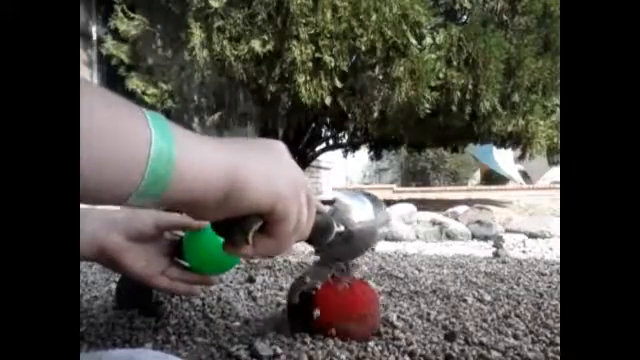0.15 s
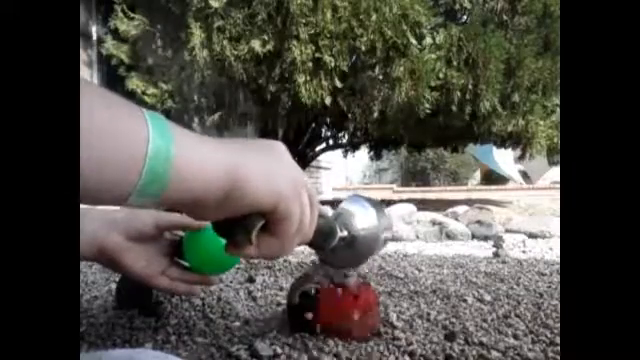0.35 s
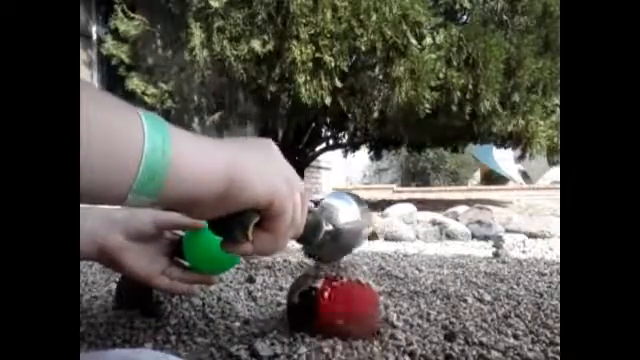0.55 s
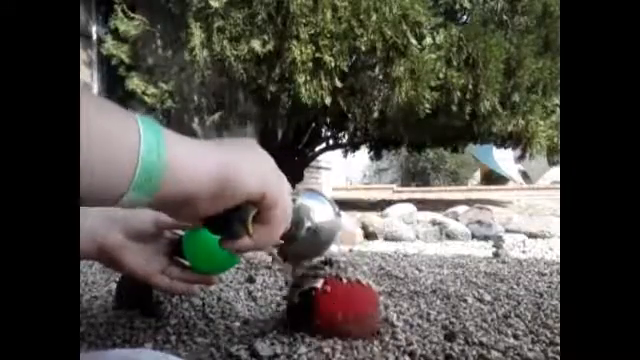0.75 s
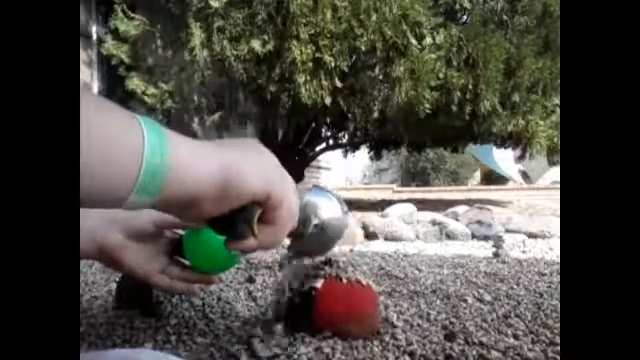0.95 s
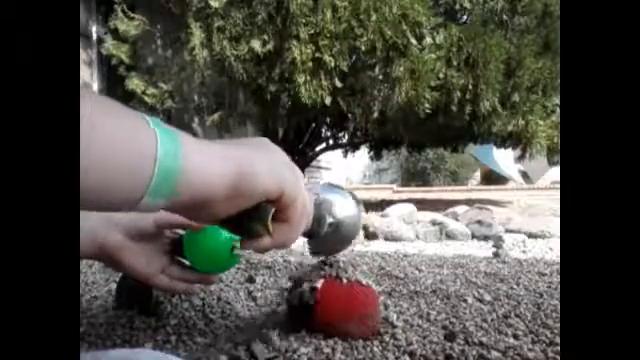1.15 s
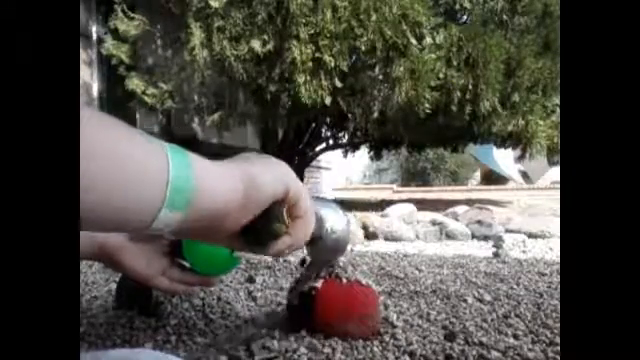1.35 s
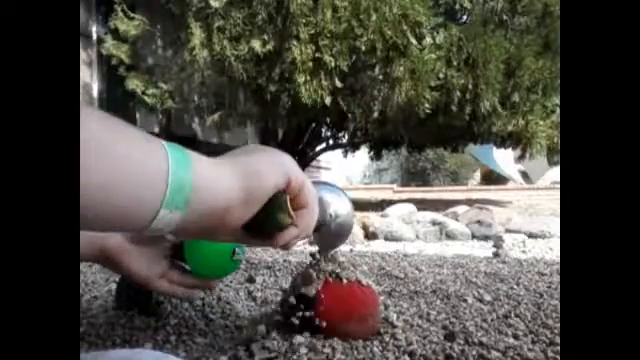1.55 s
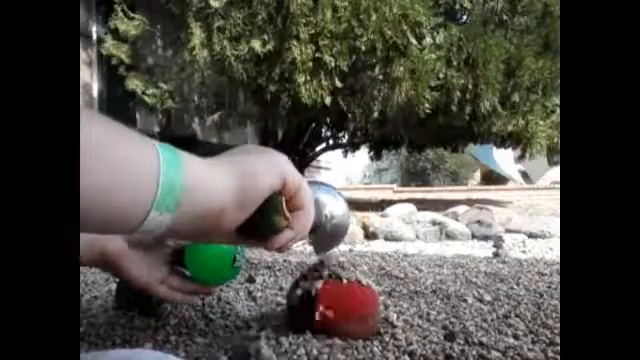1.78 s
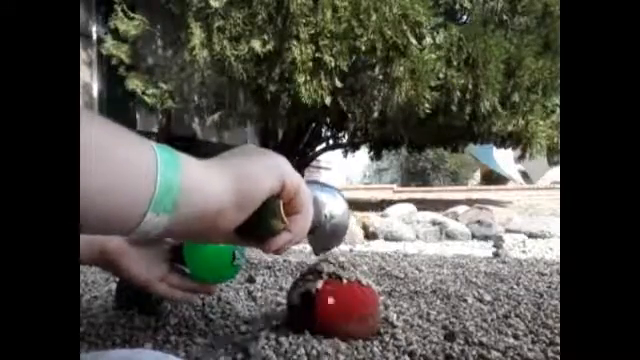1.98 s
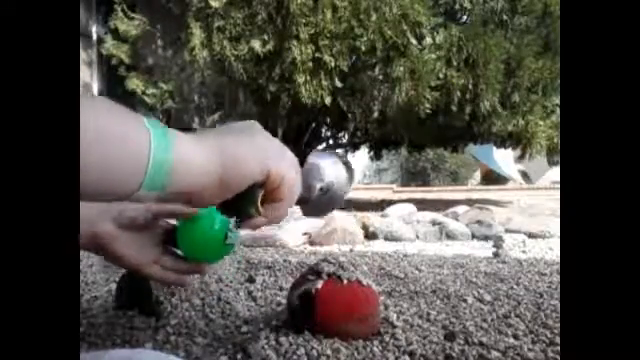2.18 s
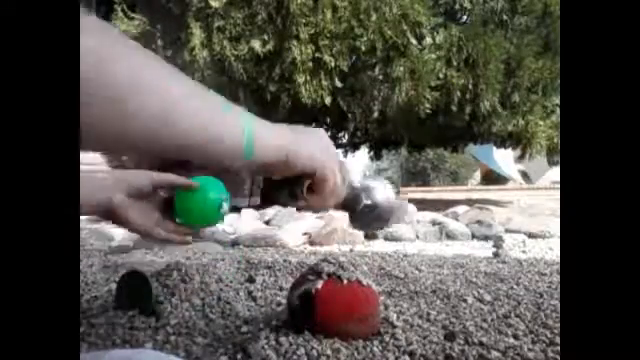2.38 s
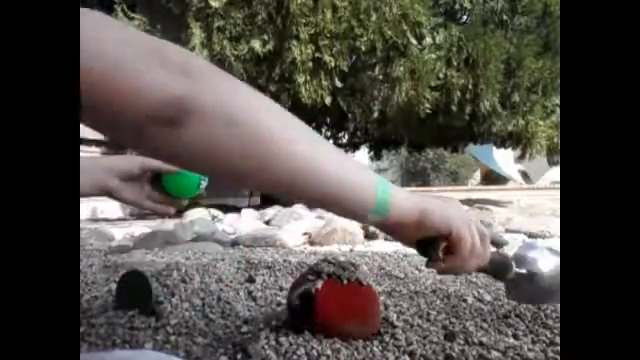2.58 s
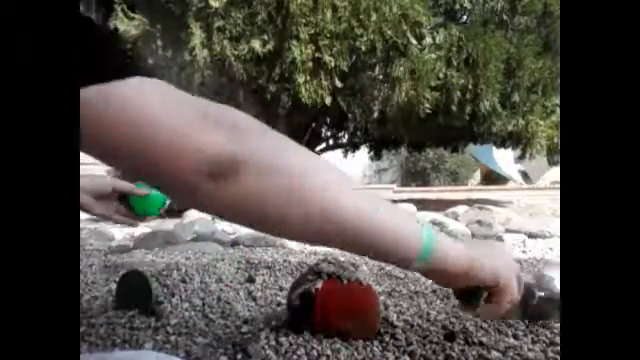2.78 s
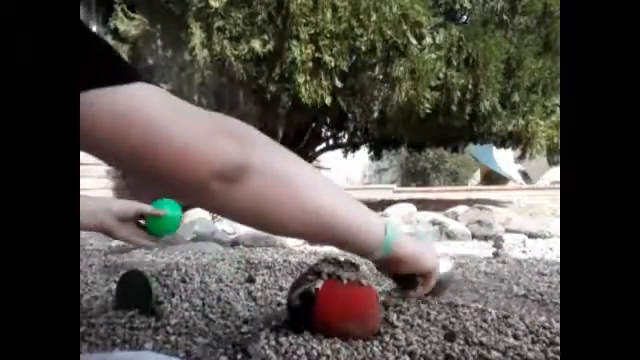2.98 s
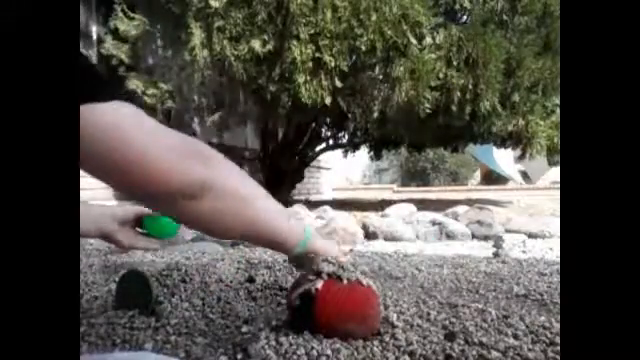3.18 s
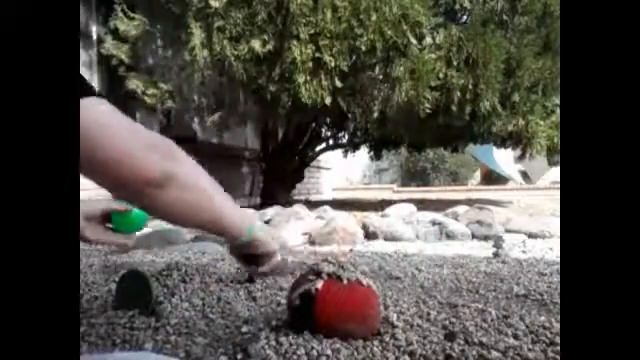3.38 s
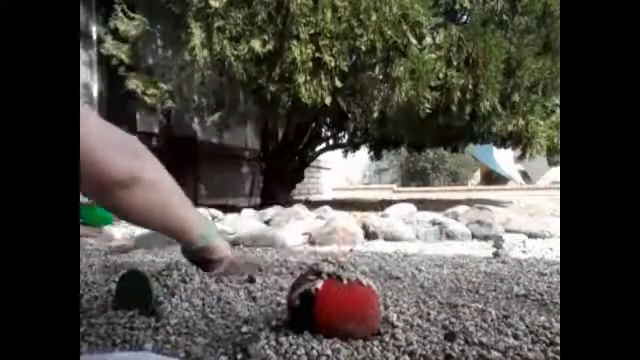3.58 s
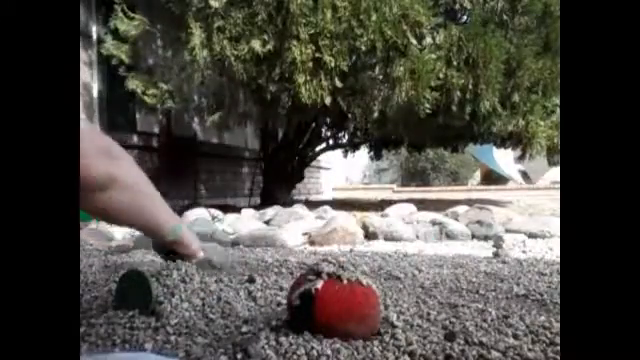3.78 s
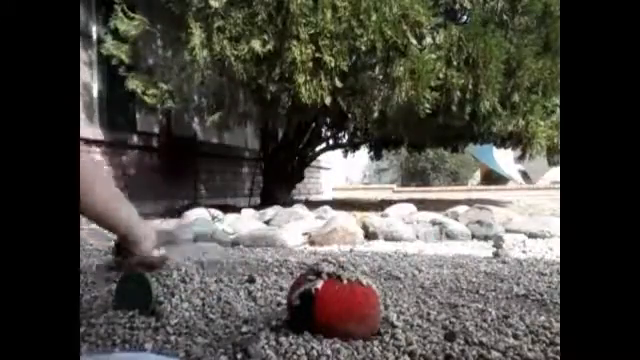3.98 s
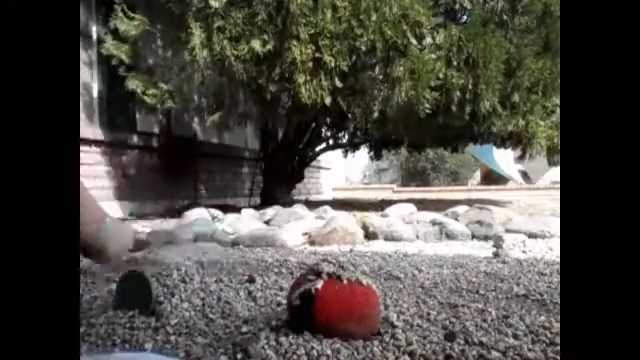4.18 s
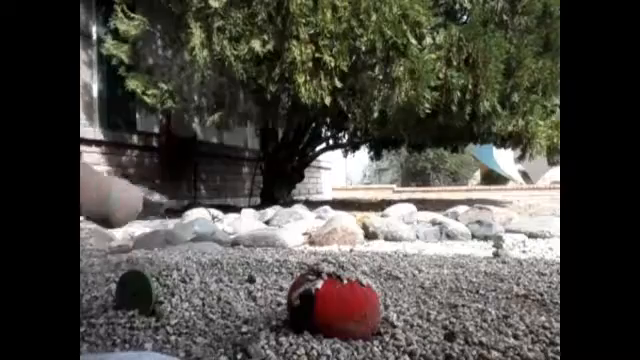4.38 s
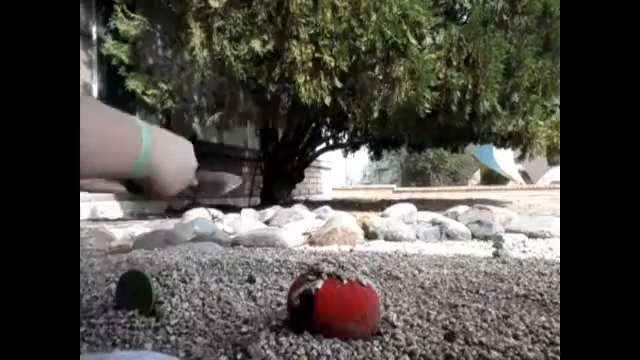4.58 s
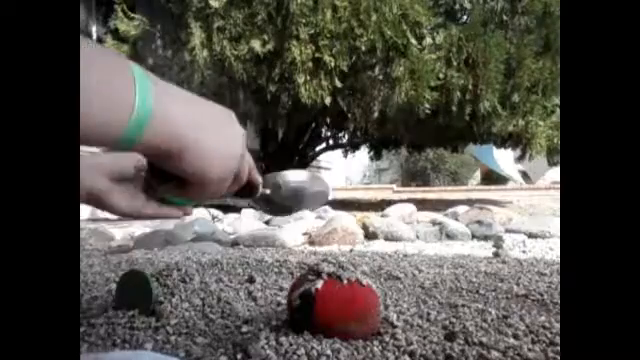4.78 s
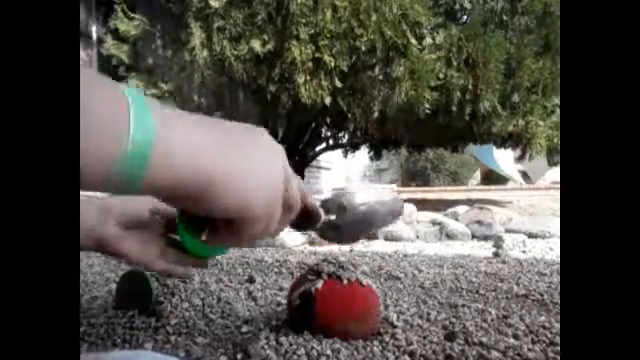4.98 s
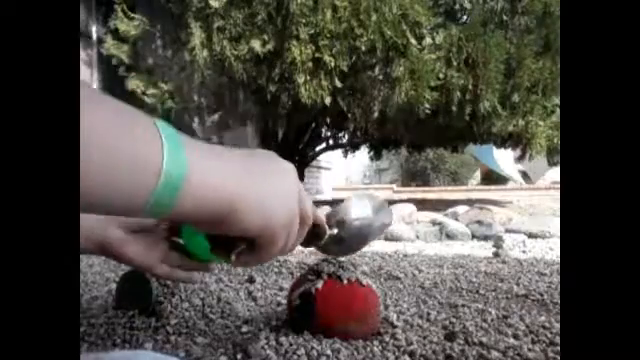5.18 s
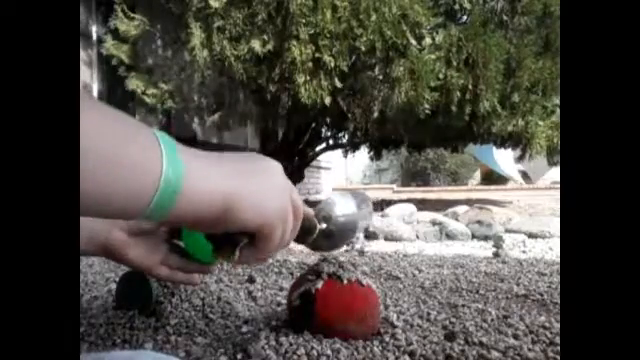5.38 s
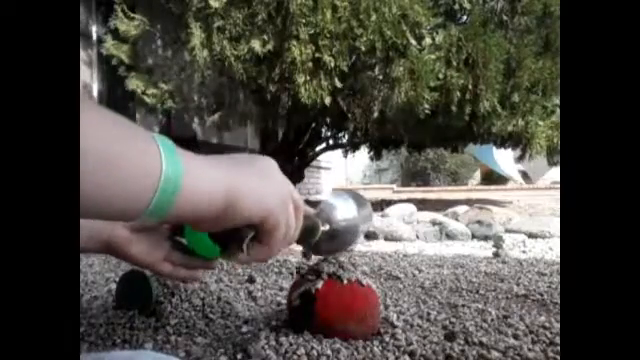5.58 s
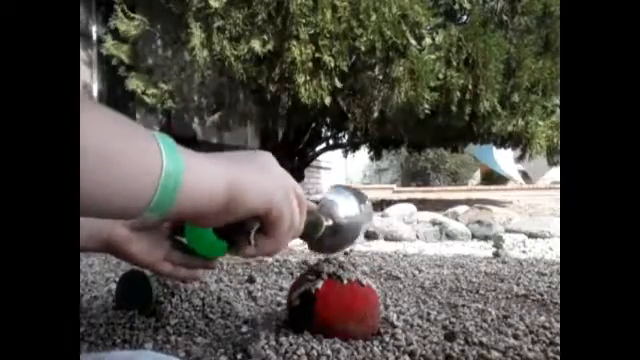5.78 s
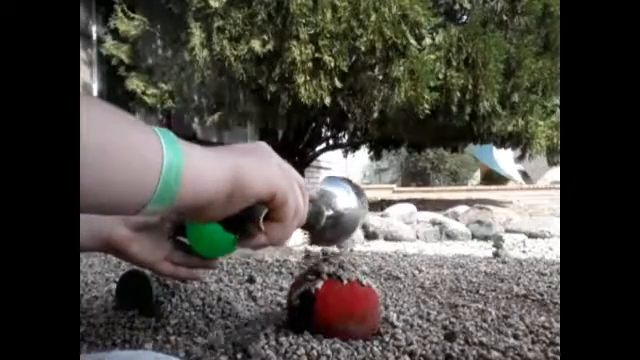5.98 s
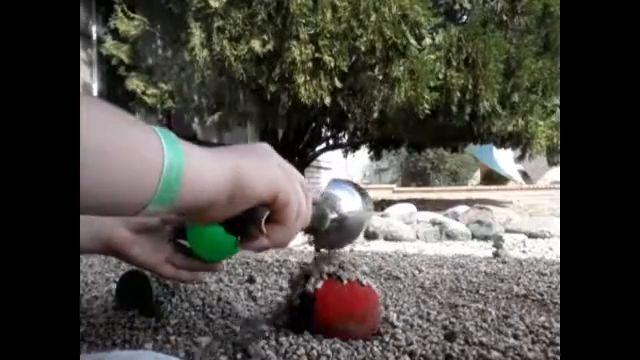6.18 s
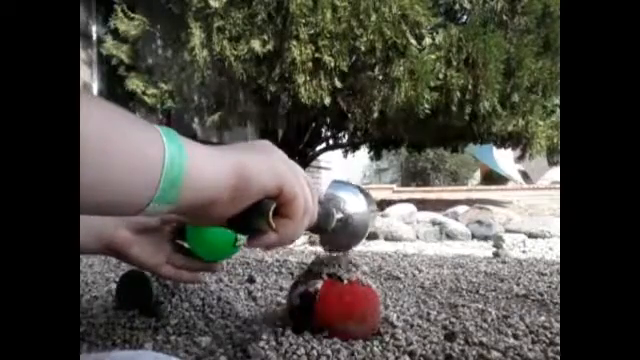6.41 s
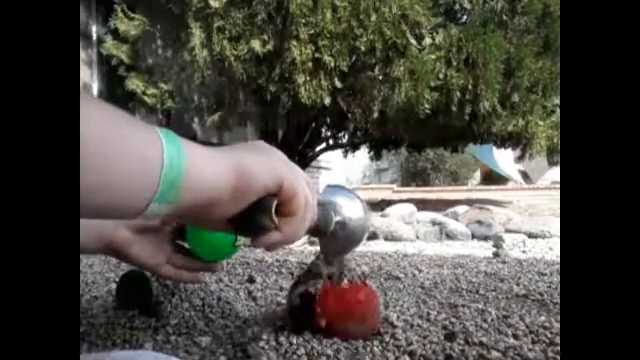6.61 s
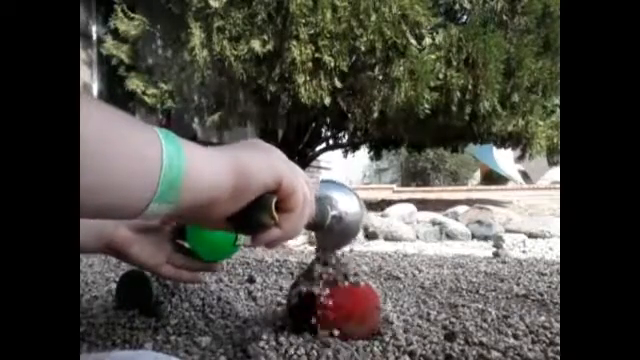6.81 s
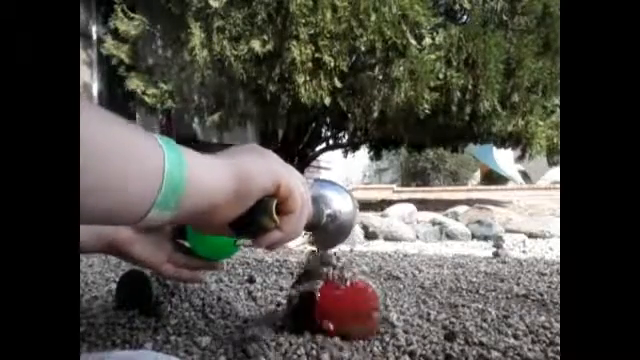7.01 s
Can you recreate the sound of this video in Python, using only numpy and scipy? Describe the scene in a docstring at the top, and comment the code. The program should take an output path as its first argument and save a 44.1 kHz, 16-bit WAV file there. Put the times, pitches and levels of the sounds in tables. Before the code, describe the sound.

Close to the microphone in a quiet yard, gravel is already trickling from a steel scoop at 0 s, dry bright clicks in uneven surges with larger pebbles clacking singly, fuller around 1.0-1.2 s. The flow thins, bursts again near 1.7 s, and the emptying bowl gives small metallic knocks, the clearest ping at 2.1 s. A faint airy hiss with a thin whistle swells around 2.4-2.8 s. At 2.9 s the blade bites into the bed: loud steely crunches and sharp catches until about 3.4 s, then softer dragging scrapes and dull thuds to 4.4 s. Sparse faint ticks follow. From 5.4 s a second load pours, pebbles knocking lower on the heaped bowl, then trickling brightly in pulses to the cut at 7 s. Low distant traffic and engine hum continue, a second drone fading in after 4 s; a thin gliding bird calls very faintly at 2.85 s and more clearly at 6.7 s.

```python
"""A quiet yard, close to a gravel bed where a steel scoop is at work.
The scoop trickles fine gravel over a ball, is shaken empty, digs in again and pours a second load.
Contacts are short noise cracks with decaying sines; filters and ringing modes give the gravel and steel.
The bowl sings longer once it is bare; a faint airy hiss swells before the dig. Far off are filtered-noise
traffic, humming engine tones and a bird of gliding harmonics; the yard faintly echoes the near sounds."""
import sys
import numpy as np
from scipy import signal
from scipy.fft import rfft, irfft, next_fast_len
from scipy.io import wavfile
from scipy.ndimage import uniform_filter1d, map_coordinates

SR = 44100
rng = np.random.default_rng(int(sys.argv[2]) if len(sys.argv) > 2 else 0)


def pcm_store(signal):
    """Save signal as 16-bit PCM."""
    levels = np.round(np.clip(np.atleast_2d(signal), -1, 1) * 32767)
    wavfile.write(sys.argv[1], SR, levels.astype(np.int16).T)


N = 310905

# resonances of the bowl damped by its load: (frequency [Hz], width [Hz], relative level [dB])
LOADED_BOWL = [(3510, 62, -8.5), (4130, 76, -9), (4540, 60, -11), (4840, 150, -2), (6110, 160, -9.5),
               (7810, 1130, -12)]
# colour of stone clicks: (frequency [Hz], gain [dB])
CLICK_COLOUR = [(200, -36), (700, -24.5), (1350, -27), (1900, -13.5), (2400, -15), (3200, -9.5), (4200, -2),
                (4950, 4), (5700, -8), (6200, -6.5), (7000, -11), (9300, -9.5), (13000, -20.5),
                (15500, -57)]
# colour of dragged and pattering gravel: (frequency [Hz], gain [dB])
DRAG_COLOUR = [(120, -44), (200, -4), (258, -16.5), (454, -13.5), (554, -17), (715, -15), (1350, -13.5),
               (1560, -8), (3890, -7), (4580, 0), (5700, -11), (6240, -6.5), (10800, -15.5), (13900, -26.5),
               (15500, -52)]


def amp(db):
    """Decibels to gain."""
    return 10 ** (np.asarray(db) / 20)


def unit(x):
    """Scaled to rms 1."""
    return x / np.sqrt(np.mean(x ** 2) + 1e-20)


def peaked(x, size=44):
    """Scaled so that the loudest millisecond has the power of a sine of peak 1."""
    power = uniform_filter1d(x ** 2, size, mode="constant")
    return x / np.sqrt(2 * power.max())


def fade(t, t60):
    """Exponential decay by 60 dB in t60 seconds."""
    return np.exp(-np.log(1000) * t / t60)


def along(points, hz):
    """(Hz, value) points interpolated on a log frequency axis."""
    f, v = np.transpose(points)
    return np.interp(np.log(hz + 1), np.log(f + 1), v)


def curves(rows):
    """One value per sample for each column after the time."""
    s, *cols = np.transpose(rows)
    t = np.arange(N) / SR
    return [np.interp(t, s, c) for c in cols]


def during(rows):
    """1 while a table lasts, with soft edges."""
    t = np.arange(N) / SR
    inside = (t >= rows[0][0]) & (t <= rows[-1][0])
    return uniform_filter1d(1. * inside, size=128)


def wobble(rate):
    """A smooth random curve, rate knots a second."""
    fine = np.arange(0, N + 64, 32)
    knots = rng.standard_normal(int(N * rate / SR) + 4)
    smooth = map_coordinates(knots, [fine * rate / SR])
    return np.interp(np.arange(N), fine, smooth)


def swells(s, hold, db, rise, fall):
    """Joint gain of movements that each build up to a time, hold and die away (slopes in dB per s)."""
    grid = np.arange(0, N + 64, 32)
    t = grid[:, None] / SR - s
    level = db - rise * np.maximum(-t, 0) - fall * np.maximum(t - hold, 0)
    joint = np.linalg.norm(amp(level), axis=1)  # powers add
    return np.interp(np.arange(N), grid, joint)


def through(x, response):
    """x convolved with an impulse response."""
    return signal.oaconvolve(x, response)[:len(x)]


def coloured(x, spectrum, size=4096):
    """x through a causal filter with the given spectrum, made minimum-phase by folding the cepstrum."""
    gain_db = along(spectrum, np.fft.rfftfreq(size, 1 / SR))
    cepstrum = irfft(np.log(amp(gain_db)))
    cepstrum[1:size // 2] *= 2
    cepstrum[size // 2 + 1:] = 0
    return through(x, irfft(np.exp(rfft(cepstrum))))


def brightened(x, db, edge_hz=6800):
    """x with its treble raised or lowered."""
    body = signal.convolve(x, signal.firwin(25, edge_hz, fs=SR), "same")
    return body + amp(db) * (x - body)


def steady(x, size=2200):
    """Holds the short-term rms near 1 and keeps the grain."""
    power = uniform_filter1d(uniform_filter1d(unit(x) ** 2, size), size)
    return x / np.std(x) / np.sqrt(np.abs(power) + 1e-4)


def add(track, s, sound):
    """Mixes a sound in at a time."""
    part = track[max(round(s * SR), 0):][:len(sound)]
    part += sound[:len(part)]


def ring(modes, scatter_db, size=11000):
    """Decaying modes (Hz, dB, t60), at new strengths and phases for each blow."""
    t = np.arange(size) / SR
    total = np.zeros(size)
    for hz, db, t60 in modes:
        strength = amp(db + scatter_db * rng.normal())
        total += strength * fade(t, t60) * np.sin(2 * np.pi * (hz * t + rng.random()))
    onset = 1 - fade(t, 0.00077)  # the contact lasts a moment
    return onset * total


def resonating(x, resonances, size=2048):
    """x through resonances (Hz, width Hz, dB), at rms 1; a narrow one rings longer."""
    modes = [(hz, db + 20 * np.log10(width), np.log(1000) / (np.pi * width))
             for hz, width, db in resonances]
    return unit(through(x, ring(modes, scatter_db=2.5, size=size)))


def clacks(count, crack_t60, ring_t60, ring_db, size=700):
    """One row per stone contact: a crack and the brief ring of a pebble of random size."""
    t = np.arange(size) / SR
    hz = 4800 * np.exp(0.3027 * rng.standard_normal((count, 1)))
    crack = rng.standard_normal((count, size)) * fade(t, crack_t60)
    return crack + amp(ring_db) * np.sin(2 * np.pi * hz * t) * fade(t, ring_t60)


def rattle(rate, spread_db, crack_t60=0.0067, ring_t60=0.04, ring_db=-10.0, count=500):
    """Random contacts, rate per second (constant or per sample), drawn from a stock of count clacks."""
    starts = np.flatnonzero(rng.random(N) < rate / SR)
    sizes = amp(spread_db * np.minimum(rng.standard_normal(N)[starts], 2))  # many small, a few large
    stones = clacks(count=count, crack_t60=crack_t60, ring_t60=ring_t60, ring_db=ring_db, size=300)
    rows = stones[starts % count] * sizes[:, None]
    places = starts[:, None] + np.arange(rows.shape[1])
    return np.bincount(places.ravel(), rows.ravel(), N)[:N]


def in_scoop(contacts, spectrum, resonances, steel_db):
    """Stone contacts with the short ring of the bowl."""
    stone = unit(coloured(contacts, spectrum, size=2048))
    return stone + amp(steel_db) * resonating(contacts, resonances)


def heaped():
    """1 while the full load weighs on the scoop's lip, else 0."""
    on, off, shift = 5.42, 5.92, .1  # onto the lip, off it, length of each change [s]
    return curves([(on, 0), (on + shift, 1), (off, 1), (off + shift, 0)])[0]


def pouring():
    """Separate clicks in a trickle merge into a bright rush; bigger stones tumble, grit patters on the bed."""
    # each tilt of the wrist lets gravel slide out: (time of full flow [s], hold [s], level [dB])
    slides = [(0, 0.049, -27), (0.146, 0.032, -30.5), (0.309, 0.13, -29), (0.576, 0.082, -26.5),
              (0.764, 0.095, -34.5), (1.012, 0.2, -21), (1.3, 0.016, -32), (1.515, 0.091, -30.5),
              (1.703, 0.049, -19), (1.905, 0.022, -26.5), (2.01, 0.12, -37), (4.513, 0.068, -46.5),
              (5.093, 0.0075, -48), (5.545, 0.32, -31.5), (6.058, 0.13, -32), (6.245, 0.073, -26.5),
              (6.408, 0.036, -26), (6.537, 0.15, -31.5), (6.804, 0.12, -25.5), (6.974, 0.055, -30)]
    # the bowl heaped full rings lower: (frequency [Hz], width [Hz], relative level [dB])
    heaped_bowl = [(4150, 160, 1.5), (4640, 130, -11), (6100, 400, -8)]
    trickle_per_s, rush_per_s = 300, 3500  # contacts in the thinnest flow; those added in the fullest
    normal_flow_db = -38  # a flow of unaltered brightness
    brightening = 0.1  # harder contacts are shorter: dB of treble per dB of flow

    # a slide gathers quickly and runs out more slowly
    flow = swells(*np.transpose(slides), rise=163, fall=106)
    rate = trickle_per_s + rush_per_s * (flow / flow.max()) ** .9
    fine = steady(rattle(rate, spread_db=6.5, crack_t60=0.0089))
    tumbling = unit(rattle(110, spread_db=3, crack_t60=.006, ring_t60=.012, ring_db=-1))
    contacts = fine + amp(-8) * tumbling

    heap = heaped()
    light = unit(in_scoop(contacts, CLICK_COLOUR, LOADED_BOWL, steel_db=-3.5))
    heavy = unit(in_scoop(contacts, CLICK_COLOUR, heaped_bowl, steel_db=-2))
    sliding = np.sqrt(1 - heap) * light + np.sqrt(heap) * heavy
    patter = unit(coloured(rattle(1200, spread_db=7), DRAG_COLOUR))
    treble_db = brightening * (20 * np.log10(flow + 1e-9) - normal_flow_db)
    return amp(-0.75) * flow * brightened(sliding + amp(-10.5) * patter, treble_db)


def pebbles():
    """Larger pebbles strike singly, each with its own note, and rebound a few milliseconds later."""
    # the largest pebbles landing: (time [s], relative peak level [dB])
    landings = [(0.0232, -11), (0.1147, -5.5), (0.183, -12.5), (0.235, -13), (0.2815, -9.5), (0.3446, -8),
                (0.384, -5.5), (0.4492, -5.5), (0.489, -7.5), (0.504, -7.5), (0.5365, -12), (0.5904, -8.5),
                (0.6597, -6.5), (0.694, -6), (0.8014, -13.5), (0.9266, -4.5), (0.956, -11), (1.0712, -7),
                (1.1112, -4.5), (1.13, -3.5), (1.336, -8), (2.3118, -23.5), (4.5306, -22), (4.604, -27),
                (4.667, -23.5), (4.6875, -21.5), (4.8496, -16), (4.929, -27), (5.1098, -20.5),
                (5.1253, -22), (5.1457, -25), (5.3064, -16.5), (5.472, -14.5), (5.5172, -9.5),
                (5.5642, -4.5), (5.614, -14), (5.6257, -15), (5.65, -10), (5.733, -7), (5.7482, -5),
                (5.8132, -2.5), (5.8258, -7.5), (5.925, -12), (5.952, -13), (6.0542, -6), (6.0734, -10.5),
                (6.1265, -11.5), (6.157, -13), (6.1862, -4.5), (6.387, -9.5), (6.6562, -8.5), (6.8585, -10),
                (6.9863, -7.5)]
    light_hz, heaped_hz, scatter = 4858, 4240, 0.038  # note in a light load, on the heap; spread (share)
    flight_s = 0.0033  # mean time to the second contact

    out = np.zeros(N)
    pitch = light_hz + (heaped_hz - light_hz) * heaped()
    for s, db in landings:
        hit = np.zeros(SR // 16)
        first, second = clacks(count=2, crack_t60=0.026, ring_t60=0.0081, ring_db=-1.5)
        add(hit, 0, first)
        add(hit, flight_s * (.5 + rng.random()), amp(-11.5) * second)
        hz = pitch[round(s * SR)] * np.exp(scatter * rng.normal())
        note = unit(ring([(hz, 0, 0.017)], scatter_db=0, size=len(hit)))
        click = in_scoop(hit, CLICK_COLOUR, LOADED_BOWL, steel_db=-8) + amp(-4.5) * note
        add(out, s, amp(db - 4.0) * peaked(click))
    return out


def digging():
    """The blade bites with a steely crunch, then drags loose gravel; stones catch on it and the bed thuds."""
    # pushes through the bed: (time of full force [s], hold [s], level [dB], fall [dB/s])
    pushes = [(2.901, 0.024, -16, 236), (2.99, 0.07, -13, 200), (3.101, 0.012, -15, 253),
              (3.184, 0.14, -19.5, 60), (3.587, 0.068, -32.5, 80), (3.773, 0.044, -32.5, 114),
              (3.895, 0.05, -34.5, 110), (4.036, 0.028, -29.5, 81), (4.127, 0.026, -23, 190),
              (4.281, 0.087, -29, 214)]
    # stones catching on the blade: (time [s], relative peak level [dB])
    catches = [(2.916, -1), (2.970, -3.5), (2.990, -6.5), (3.029, -2), (3.069, -11), (3.133, -9),
               (3.154, 1), (3.184, -8), (3.246, -4), (3.773, -26), (4.125, -10.5), (4.157, -15),
               (4.342, -18)]
    # dull thuds as packed stones give way: (time [s], frequency [Hz], relative peak level [dB])
    thuds = [(3.209, 675, -27), (3.248, 1130, -23), (3.3, 556, -26), (3.776, 835, -23.5),
             (3.785, 1943, -22.5), (4.157, 463, -22)]
    # colour of the crunch: (frequency [Hz], gain [dB])
    crunch_colour = [(350, -70), (600, -33), (1170, -19), (1410, -24), (2050, -16), (2600, -5.5),
                     (3160, -12.5), (3420, -2.5), (3870, -5.5), (4750, 4.5), (6400, -22), (7740, -53),
                     (11200, -27.5), (15500, -51)]
    plunge, lift = 2.91, 4.46  # the blade enters and leaves the bed [s]
    bite_share, bite_hold, bite_fade = 0.94, .16, .45  # power share at first, hold [s], time constant [s]

    moving = during([(plunge,), (lift,)])
    start, hold, level, fall = np.transpose(pushes)
    force = swells(start, hold, level, rise=283, fall=fall)
    # the blade mostly bites at first, then more and more only drags
    since_hold = np.maximum(np.arange(N) / SR - plunge - bite_hold, 0)
    bite = bite_share * np.exp(-since_hold / bite_fade)
    biting = rattle(1300 * moving * bite, spread_db=5)
    crunch = steady(in_scoop(biting, crunch_colour, LOADED_BOWL, steel_db=-5.5), size=900)
    dragging = rattle(2000 * moving, spread_db=2.5, ring_db=-9.5)
    drag = steady(coloured(dragging, DRAG_COLOUR), size=1000)
    out = amp(-0.42) * moving * force * (np.sqrt(bite) * crunch + np.sqrt(1 - bite) * drag)

    t = np.arange(SR // 12) / SR
    for s, db in catches:
        burst = rng.standard_normal(len(t)) * fade(t, 0.048)
        add(out, s, amp(db - 4.0) * peaked(coloured(burst, crunch_colour)))
    for s, hz, db in thuds:
        hollow = [(hz / 4, -18), (hz * 0.79, -7), (hz, 0), (hz * 1.27, -9), (hz * 3, -14), (hz * 8, -45)]
        burst = rng.standard_normal(len(t)) * fade(t, 0.06)
        add(out, s, amp(db - 2.5) * peaked(coloured(burst, hollow)))
    return out


def bare_bowl():
    """With its load gone the steel rings freely under skidding and knocking pebbles."""
    # modes of the bare bowl: (frequency [Hz], relative level [dB], t60 [s])
    modes = [(1470, -23, .08), (2783, -15, .08), (3451, -13, .26), (3570, -16, .1), (4134, -12, .12),
             (4430, -11, .09), (4552, 0, .15), (4810, -11, .12), (6293, -20, .16), (7655, -23, .17),
             (7870, -15, .11), (8436, -28, .15), (9230, -26, .13), (10300, -25, .1)]
    # shakes send the last pebbles skidding: (time of full speed [s], hold [s], relative level [dB])
    shakes = [(1.68, 0.038, -23), (1.755, 0.024, -23), (1.864, 0.02, -31)]
    # knocks on the nearly empty bowl: (time [s], relative peak level [dB])
    knocks = [(1.762, -10.5), (1.801, -9), (1.875, -13), (2.084, -3.5), (2.104, -13)]

    skidding = swells(*np.transpose(shakes), rise=600, fall=304)
    bowl = ring(modes, scatter_db=0)
    out = amp(-0.5) * skidding * steady(through(rattle(760, spread_db=10.0), bowl))
    for s, db in knocks:
        steel = peaked(ring(modes, scatter_db=1))
        burst = rng.standard_normal(len(steel)) * fade(np.arange(len(steel)) / SR, 0.061)
        crack = peaked(coloured(burst, CLICK_COLOUR))
        add(out, s, amp(db - 2.0) * (steel + amp(-7.0) * crack))
    return out


def airy_hiss():
    """A faint airy hiss swells and fades before the dig, with one thin steady whistle in it."""
    # swell of the hiss: (time [s], level [dB])
    swell = [(2.33, -63), (2.46, -45), (2.66, -48.5), (2.9, -58)]
    # resonances of the hiss: (frequency [Hz], width [Hz], relative level [dB])
    hiss_bands = [(1490, 90, -9.5), (2410, 270, -2.5), (4150, 65, -2.5), (4430, 130, -5)]

    hiss = resonating(rattle(2500, spread_db=2.5), hiss_bands)  # dense clicks blur into a hiss
    thin = [(4740, 22, 0)]  # a very narrow resonance
    whistle = steady(resonating(rng.standard_normal(N), thin, size=8192))
    hiss_gain = during(swell) * amp(curves(swell)[0])
    return hiss_gain * hiss + during(swell[1:]) * amp(-50.5) * whistle


def yard_echo(x):
    """Walls and ground return a weak, short echo: decaying noise, shorter in the treble."""
    # echo decay: (frequency [Hz], t60 [s])
    decay = [(200, 0.28), (4500, 0.17), (12000, 0.032)]
    hz, t, z = signal.stft(rng.standard_normal(SR // 3), SR, nperseg=256)
    tail = signal.istft(z * fade(t, along(decay, hz)[:, None]), SR, nperseg=256)[1]
    return through(x, np.pad(tail / np.linalg.norm(tail), (SR // 250, 0)))  # 4 ms of travel


def bird(call):
    """A thin, fluttering call that glides; its second and third harmonics carry it."""
    hz, db = curves(call)
    phase = 2 * np.pi * np.cumsum(hz * (1 + 0.0064 * wobble(150))) / SR
    voice = sum(amp(level) * np.sin(k * phase) for k, level in enumerate([-13, 6, 3, -8], 1))
    return during(call) * amp(db + 1.5 + 2 * wobble(50)) * unit(voice)


def engine_tone(hz, db):
    """A distant engine's hum: one sine whose pitch and level waver."""
    level = amp(db + 2.3 * wobble(7.9)) * np.sqrt(2)
    return level * np.sin(2 * np.pi * np.cumsum(hz + wobble(6)) / SR)


def background():
    """Far traffic as filtered noise, a wavering engine note, and a second vehicle's drone that fades in."""
    # heard level of the background noise, dipping during the loud dig: (time [s], relative level [dB])
    noise_level = [(0, -45.5), (2.8, -44.5), (3.1, -48.5), (3.9, -45), (4.45, -47.5), (5.5, -46),
                   (7.05, -42.5)]
    # colour of the yard's air: (frequency [Hz], gain [dB])
    air_colour = [(38, -21), (50, 0.5), (75, -4.5), (100, -2), (170, -0.5), (450, -8.5), (750, -16),
                  (1050, -13.5), (1450, -25), (1900, -23), (2450, -20.5), (3200, -19), (4500, -13.5),
                  (5500, -24), (7200, -25.5), (8400, -34.5), (14000, -58)]
    # a distant engine's hum, heard to drop as the dig starts: (time [s], frequency [Hz], rms level [dB])
    hum = [(0, 134, -47), (2.87, 128.1, -46), (2.92, 125.2, -57), (7.05, 127.1, -54)]
    # a second vehicle: (frequency [Hz], rms level [dB])
    drone = [(75, -51.5), (177, -51.5), (238, -53)]

    air = unit(coloured(rng.standard_normal(N), air_colour, size=16384))
    air = air * amp(curves(noise_level)[0] + 2.0 + 0.078 * wobble(5.13))
    nearing = np.interp(np.arange(N) / SR, [4, 5.5], [0, 1])
    second = sum(engine_tone(hz, db) for hz, db in drone)
    return air + engine_tone(*curves(hum)) + nearing * second


def scene():
    """Gravel close to the microphone, the yard behind it; the bird shares the yard's echo."""
    # a bird's two calls, each with rows of (time [s], pitch [Hz], relative level [dB])
    calls = [
        [(2.81, 1470, -60), (2.85, 1430, -54), (2.92, 1280, -56)],
        [(6.66, 1425, -54), (6.683, 1490, -32), (6.725, 1430, -43), (6.762, 1127, -47), (6.94, 1350, -43.5),
         (7.0, 1100, -48)],
    ]
    near = pouring() + pebbles() + digging() + bare_bowl() + airy_hiss()
    voiced = near + sum(bird(call) for call in calls)
    return (voiced + amp(-14.5) * yard_echo(voiced) + background())[None]


def record(dry):
    """The microphone chain rounds off the highest peaks and keeps nothing above its band limit."""
    top_hz = 15400
    rounded = dry / (1 + np.abs(dry / .9) ** 6) ** (1 / 6)
    size = next_fast_len(N + SR // 4)
    passed = np.fft.rfftfreq(size, 1 / SR) < top_hz
    return irfft(rfft(rounded, size) * passed, size)[:, :N]


dry = scene()
out = record(dry)
pcm_store(out)
```